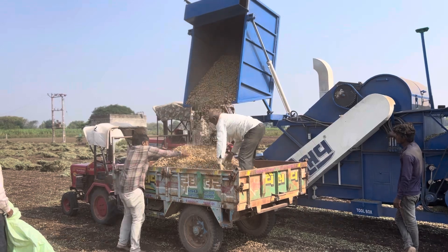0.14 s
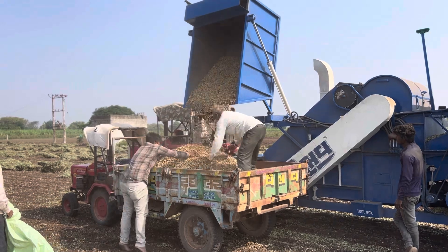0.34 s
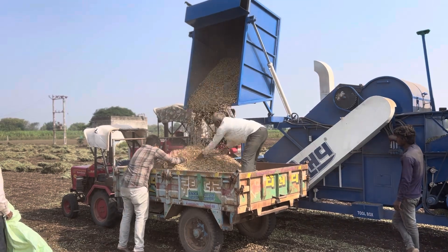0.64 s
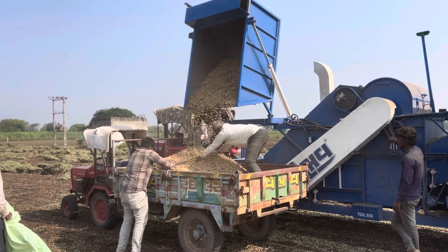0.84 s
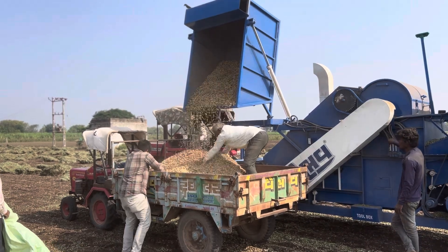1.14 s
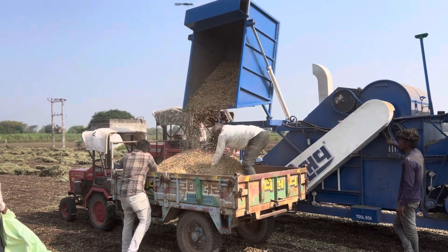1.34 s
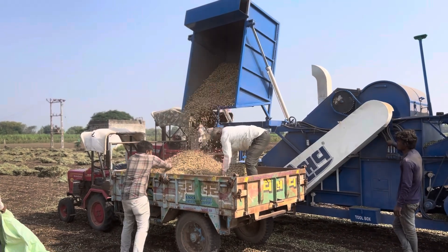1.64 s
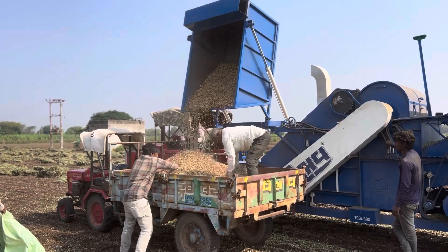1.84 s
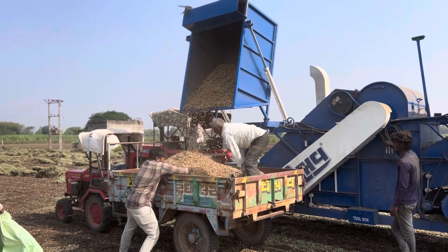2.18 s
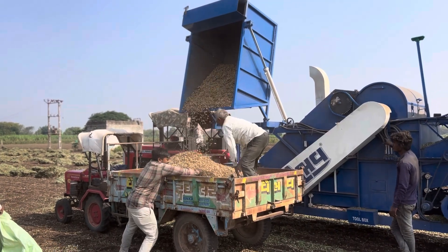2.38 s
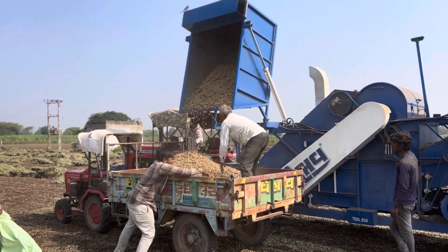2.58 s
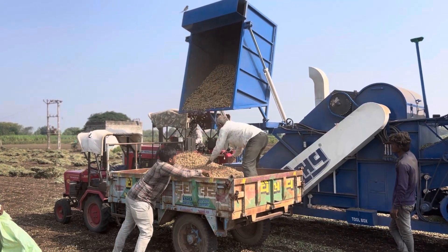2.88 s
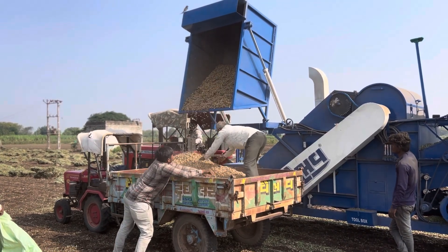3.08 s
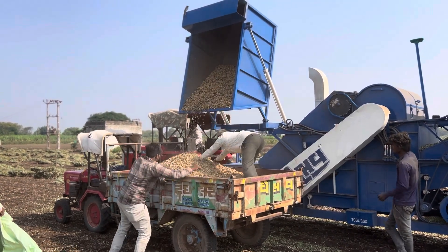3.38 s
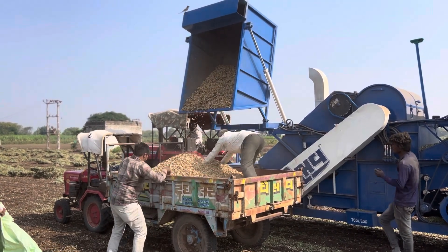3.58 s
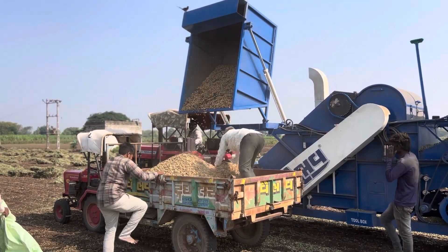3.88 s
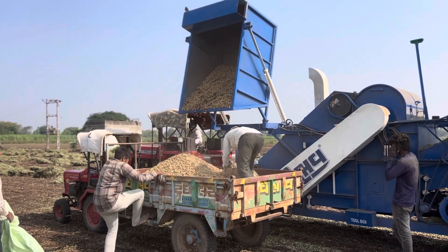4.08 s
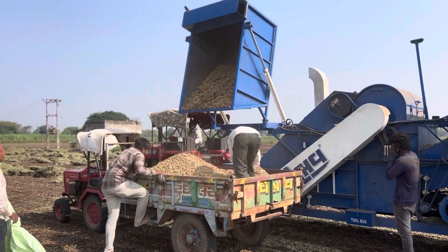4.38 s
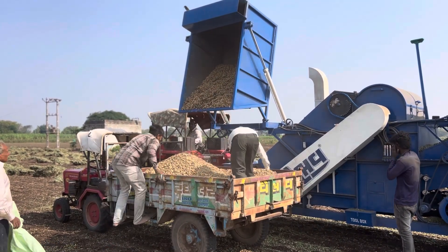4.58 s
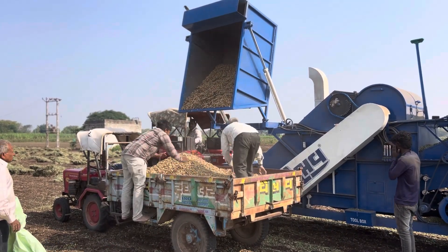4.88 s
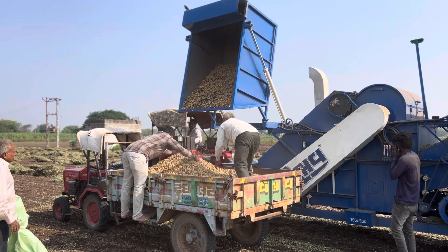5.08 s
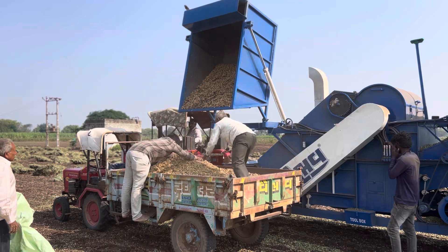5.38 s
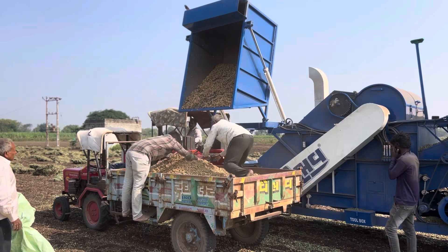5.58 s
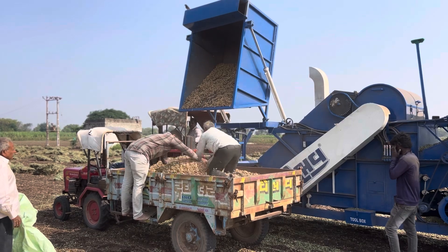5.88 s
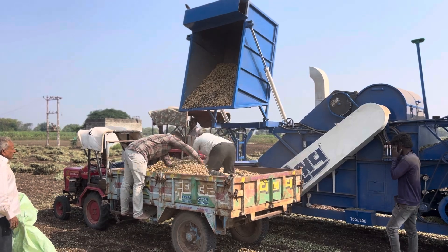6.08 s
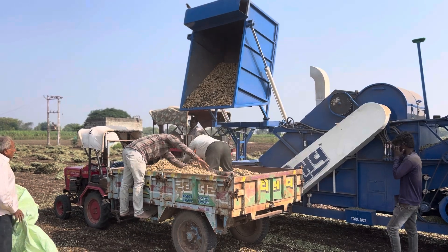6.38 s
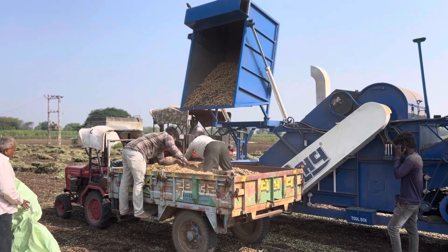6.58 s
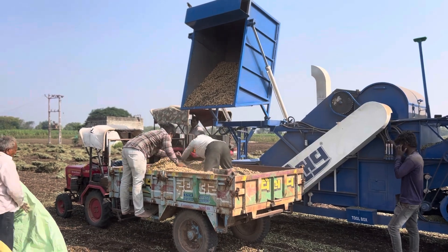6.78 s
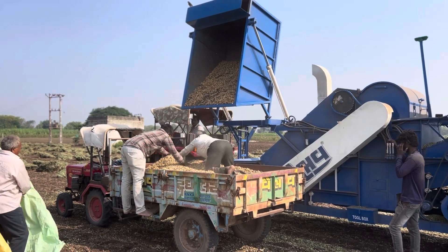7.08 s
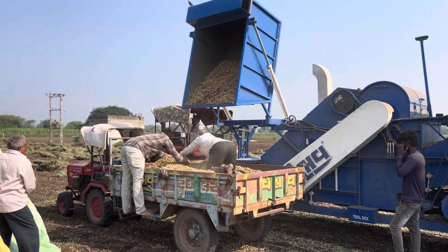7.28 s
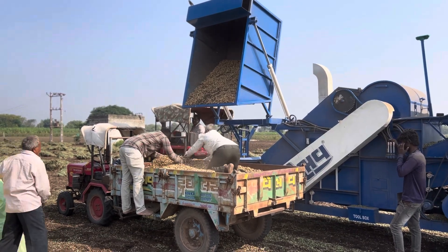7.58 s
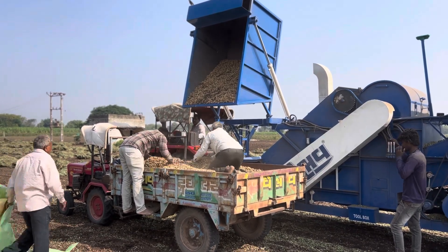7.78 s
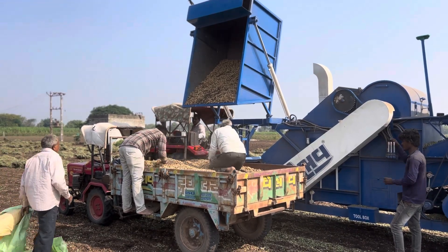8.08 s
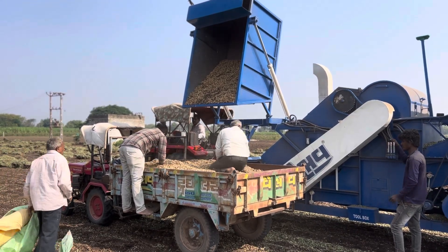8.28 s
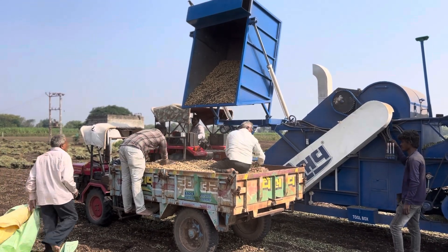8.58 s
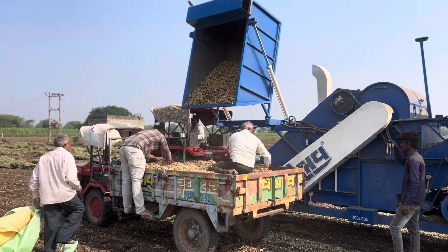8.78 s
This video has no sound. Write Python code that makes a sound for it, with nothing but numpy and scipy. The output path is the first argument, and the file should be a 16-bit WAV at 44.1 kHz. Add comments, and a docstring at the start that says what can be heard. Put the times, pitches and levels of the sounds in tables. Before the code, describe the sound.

An engine-driven thresher runs at constant speed in an open field, with a deep hum, fast chugging throb, rattling sheet metal and rushing fan air. Dry pods stream crisply into a trailer, dwindle after about two seconds to a trickle and stop. Then hands push the heap in soft rustling strokes, with brief gritty scrapes and tiny metal ticks. Stereo pickup, dry open air, no echoing room.

```python
"""An engine drives a thresher at steady speed in an open field while its tipped hopper empties pods into a trailer.
The machine hums, throbs, whines and clatters in step with its camshaft: ten turns a second, three firings a turn.
These sounds are sums of tones and noise timed by the shaft, over faint steady tones and the fan's rush of air.
The pods are thousands of random clicks. Their stream thins out after two seconds; later, hands push the heap
about in rustling strokes, with a few scrapes along the trailer and small hits on metal."""
import sys
import numpy as np
from scipy import signal
from scipy.fft import rfft, irfft
from scipy.io import wavfile

SR = 44100
rng = np.random.default_rng(int(sys.argv[2]) if len(sys.argv) > 2 else 0)


def to_wav(sig):
    """Store sig (one row per channel, or 1-D mono) as 16-bit WAV at the path in sys.argv[1].

    Samples outside -1..1 are clipped; the rate is SR.
    """
    pcm = np.clip(np.atleast_2d(sig), -1, 1) * 32767
    pcm = np.round(pcm).astype(np.int16)
    wavfile.write(sys.argv[1], SR, pcm.T)  # frames by channels


N = 394075
T = np.arange(N) / SR  # time of each sample, seconds
HZ = np.fft.rfftfreq(N, 1 / SR)  # pitch of each step of the spectrum


def gain_of(db):
    """Turns decibels into a plain multiplier of the wave."""
    return 10 ** (np.asarray(db) / 20)


def evened(x):
    """Scales a signal to an rms (average strength) of 1."""
    return x / np.sqrt(np.mean(x ** 2) + 1e-20)


def read(points, hz):
    """Reads a table between its points, with pitch spaced by ratio as the ear hears it."""
    f, value = np.transpose(points)
    return np.interp(np.log(hz + 1), np.log(f + 1), value)


def shaped(x, gain):
    """Filters a signal by multiplying each frequency by its own gain."""
    return irfft(rfft(x) * gain, N)


def wander(rate_hz):
    """A smooth random drift of rms 1: noise with everything much faster than rate_hz removed."""
    count = 4096
    hz = np.fft.rfftfreq(count, N / SR / count)
    slow = irfft(rfft(rng.standard_normal(count)) / (1 + (hz / rate_hz) ** 4))
    return evened(np.interp(T, np.linspace(0, N / SR, count), slow))


# How alike the two microphone ports hear a sound.
# Each row: pitch in Hz, likeness (1 is the same on both sides, 0 is unrelated).
LIKENESS = [(100, 1), (300, 0.96), (640, 0.89), (1400, 0.8), (3000, 0.29), (5000, 0.39), (8500, 0.4),
            (15000, 0.045)]


def ports(pair, gain):
    """Colours two unrelated signals and mixes them into a left and right that are partly alike."""
    a, b = rfft(pair) * gain
    same = np.clip(read(LIKENESS, HZ), -1, 1)
    mid = a * np.sqrt((1 + same) / 2)
    side = b * np.sqrt((1 - same) / 2)
    return irfft(np.array([mid + side, mid - side]), N)


# Speed of the camshaft.
# Each row: time in seconds, speed in turns per second.
SPEED = [(0.0, 10.07), (0.7, 10.104), (1.4, 10.062), (2.5, 10.081), (4.0, 10.093), (5.5, 10.105),
         (6.5, 10.1), (7.8, 10.094), (8.94, 10.129)]


def shaft(shake_turns=.0005):
    """Adds up the speed into the angle of the camshaft in turns, slightly unsteady."""
    start_turns = -.0095
    angle = np.cumsum(np.interp(T, *np.transpose(SPEED))) / SR + start_turns
    return angle + shake_turns * wander(6)


def tones(turns, table, lag):
    """Sums tones at whole multiples of the shaft speed, each held back by its lag in cycles."""
    waves = [gain_of(db) * np.cos(2 * np.pi * (k * turns - lag[k - 1])) for k, db in table]
    return np.sqrt(2) * sum(waves)


# Rush of the fan.
# Each row: pitch in Hz, level in dB per Hz.
RUSH = [(15, -81), (32, -74), (55, -61.5), (82, -59), (108, -63), (158, -57.3), (200, -63.5), (230, -65),
        (268, -62.5), (330, -69.5), (385, -70.5), (460, -78), (620, -73), (750, -79), (2000, -86.5),
        (6000, -110)]


def fan(gust_db=-0.9):
    """Turbulent air under the hum: coloured noise that slowly gusts."""
    air = rng.standard_normal((2, N)) * gain_of(gust_db * wander(2.1))
    return ports(air, gain_of(read(RUSH, HZ))) * np.sqrt(SR / 2)


# Faint tones out of step with the shaft.
# Each row: pitch in Hz, level in dB rms.
DRONES = [(50, -53), (76.8, -48.5), (208.2, -47.5), (251.9, -48)]


def drones(drift_turns=0.28):
    """Weak, wavering tones that beat against the hum."""
    waves = [gain_of(db) * np.sin(2 * np.pi * (hz * T + drift_turns * wander(0.84))) for hz, db in DRONES]
    return np.sqrt(2) * sum(waves)


# Single pods and bits that strike metal.
# Each row: start in seconds, ring peak in dB, ring pitch in Hz, time for the ring to fall 60 dB in seconds,
# snap against the ring in dB.
TICKS = [(.839, -29.5, 6460, 0.035, -9), (1.7575, -30, 4900, .015, -20), (1.9256, -25, 4500, .015, -22),
         (3.986, -36, 6460, .02, -20), (4.559, -33, 6300, 0.053, -24), (4.921, -39, 8000, 0.02, -1),
         (5.367, -38, 8640, .025, -3), (7.295, -43, 8350, .03, -14), (8.111, -41, 5800, .02, -6)]


def ticks(width_hz=220, snap_s=0.00049):
    """Each stray hit is a dry snap of noise and a short ring of five tones close in pitch."""
    out = np.zeros((2, N))
    t = np.arange(SR // 10) / SR
    for start, db, hz, t60, snap_db in TICKS:
        partials = hz + width_hz * rng.standard_normal((5, 1))
        waves = np.sin(2 * np.pi * (partials * t + rng.random((2, 5, 1))))
        ring = waves.sum(1) * gain_of(-60 * t / t60)
        ring = ring * np.minimum(t / .001, 1)  # starts softly over a millisecond
        snap = gain_of(snap_db) * rng.standard_normal((2, len(t))) * np.exp(-t / snap_s)
        part = out[:, round(start * SR):][:, :len(t)]
        part += gain_of(db) * (ring / abs(ring).max() + snap)
    return out


def crackle(per_s, size_db):
    """Two unrelated trains of clicks at random moments, most small, a few large."""
    sizes = gain_of(size_db * np.minimum(rng.exponential(1, (2, N)), 5))
    signs = rng.choice([-1, 1], (2, N))
    happens = rng.random((2, N)) < per_s / SR
    return evened(sizes * signs * happens)


def resonate(x, hz, width):
    """A steep resonance that follows the curve hz: shifts it down to zero pitch, smooths, shifts back."""
    turn = np.exp(2j * np.pi * np.cumsum(hz) / SR)
    r = np.exp(-np.pi * width / SR)
    smooth = signal.lfilter([(1 - r) ** 2], [1, -2 * r, r ** 2], x / turn)
    return (turn * smooth).real


GRIT_TOP_HZ = 9300  # grit has little hiss above this pitch
# Pods scrape along the trailer's walls.
# Each row: start in seconds, length in seconds, level in dB before the rise and fall,
# resonance at the start in Hz, resonance at the end in Hz, its width in Hz.
SCRAPES = [(3.985, .045, -49, 4800, 4800, 2500), (4.432, .04, -40.5, 3800, 4200, 2000),
           (4.63, .16, -45, 5200, 4800, 3500), (4.653, .025, -39.5, 3150, 3050, 700),
           (4.665, .115, -43.5, 3080, 2950, 500), (4.695, .05, -38.5, 1650, 2500, 600),
           (5.742, .06, -42, 3500, 3000, 2500), (6.515, .06, -50, 4300, 4300, 2000),
           (7.19, .06, -48.5, 4500, 5200, 3500), (8.105, .13, -51, 4900, 4900, 3500)]


def scrapes(per_s=3500, size_db=1.5, judder_db=3, attack_s=0.0092):
    """Each scrape catches quickly and judders out: gritty clicks through one resonance that may glide."""
    grit = crackle(per_s, size_db) * gain_of(judder_db * wander(90))
    out = np.zeros((2, N))
    for start, length, db, from_hz, to_hz, width in SCRAPES:
        span = slice(round(start * SR), round((start + length) * SR))
        t = T[span] - T[span][0]
        glide_hz = from_hz + (to_hz - from_hz) * t / length
        band = resonate(grit[:, span], glide_hz, width)
        scrape = evened(band + band.mean(0))  # brings the two sides closer together
        rise_and_fall = np.minimum(t / attack_s, 1) * (1 - (t / length) ** 2)
        out[:, span] += gain_of(db) * scrape * rise_and_fall
    return shaped(out, 1 / (1 + (HZ / GRIT_TOP_HZ) ** 16))


def dying(from_s, decay_s):
    """Holds at 1 until from_s, then dies away, falling to about a third every decay_s."""
    return np.exp(-np.maximum(T - from_s, 0) / decay_s)


# A full stream slowly sags, dwindles to a trickle as the hopper empties, then stops.
# The levels of pour, settling and strokes are relative: pods() sets the whole rustle's level.
POUR_DB, POUR_SAG_DB_PER_S, TRICKLE_DB = -35.5, 1, -44.5
DWINDLE_AT_S, DWINDLE_S, STOP_AT_S, STOP_S = 2.28, 0.69, 4.63, 0.093


def pour():
    """Power of the pods that fall from the hopper: the stream or the trickle, whichever is stronger."""
    stream = gain_of(POUR_DB - POUR_SAG_DB_PER_S * T) ** 2 * dying(DWINDLE_AT_S, DWINDLE_S)
    trickle = (gain_of(TRICKLE_DB) * dying(STOP_AT_S, STOP_S)) ** 2
    return np.maximum(stream, trickle)


SETTLE_DB = -57.5  # pods that keep settling in the heap
LOOSE_CRISP_DB = -3.5  # treble against the body of the rustle, for falling or settling pods
# Every stroke swells (the longer, the more slowly), holds, and dies away as the pods come to rest.
STROKE_ATTACK_S, STROKE_ATTACK_SHARE, STROKE_RELEASE_S = 0.019, 0.13, 0.081
# Hands push the heap.
# Each row: start in seconds, length in seconds, relative level in dB, treble against that level in dB.
STROKES = [(4.396, .015, -49, -14), (4.523, 0.079, -43, -10), (4.61, 0.15, -42.5, -4),
           (5.09, 0.045, -44.5, -6), (5.263, 0.57, -49, -9.5), (5.72, 0.064, -41.5, -10),
           (5.814, 0.48, -43.5, -8), (6.3, 0.33, -46.5, -9), (7.09, 0.07, -49.5, -8),
           (7.185, 0.036, -47, -10), (7.278, 0.24, -51.5, -7.5), (7.495, 0.33, -46, -10),
           (7.85, 0.3, -50.5, -10), (8.074, 0.27, -49.5, -4.5), (8.328, 0.61, -49, -5.5)]


def flow():
    """Strength of the body and of the treble of the rustle: pour, settling and strokes add in power."""
    body = pour() + gain_of(SETTLE_DB) ** 2
    treble = body * gain_of(LOOSE_CRISP_DB) ** 2
    for start, length, db, crisp_db in STROKES:
        attack_s = STROKE_ATTACK_S + STROKE_ATTACK_SHARE * length
        swell = np.clip((T - start) / attack_s, 0, 1) * dying(start + length, STROKE_RELEASE_S)
        power = (gain_of(db) * swell) ** 2
        body = body + power
        treble = treble + power * gain_of(crisp_db) ** 2
    return np.sqrt(body), np.sqrt(treble)


def hollow_pods(per_s=1500, size_db=1, t60_s=.03, low_hz=1700, high_hz=5800, size=600):
    """Whole pods knock together and ring briefly, each at its own pitch."""
    when, pitch, strength, side = rng.random((round(per_s * N / SR), 4, 1)).transpose(1, 0, 2)
    t = np.arange(size) / SR
    # most knocks are small, a few large
    level_db = size_db * np.minimum(-np.log(1 - strength), 4) - 60 * t / t60_s
    ring_hz = low_hz + (high_hz - low_hz) * pitch
    rings = gain_of(level_db) * np.sin(2 * np.pi * ring_hz * t)
    # each ring lands on the left or, N samples further on, the right
    at = (when * (N - size)).astype(int) + np.arange(size) + N * (side > .5)
    return evened(np.bincount(at.ravel(), rings.ravel(), 2 * N).reshape(2, N))


# Colour of the pod shells.
# Each row: pitch in Hz, relative level in dB per Hz.
SHELLS = [(400, -12), (1000, -10.5), (1600, 0.5), (2000, 4), (2480, 0.5), (2990, 8), (3240, 1.5), (3480, 3),
          (3900, 3), (4900, 0.1), (5600, -9.5), (7300, -15), (8300, -11.5), (9100, -14.5), (9600, -26.5),
          (10000, -51), (15500, -28.5)]
# A close reflection on the right.
# The values: delay in seconds, strength, pitch in Hz above which it fades.
ECHO = (.00124, .42, 4600)


def pods(per_s=8000, size_db=2.5, clump_db=0.82, level_db=-2.5, split_hz=6000, hollow_db=-10):
    """Thousands of dry shells click against each other in small clumps, with whole pods knocking among them."""
    clicks = crackle(per_s, size_db) + gain_of(hollow_db) * hollow_pods()
    rustle = ports(clicks * gain_of(clump_db * wander(23)), gain_of(read(SHELLS, HZ)))
    # the reflection ripples the colour on the right
    echo_s, strength, fade_hz = ECHO
    echo = strength / (1 + (HZ / fade_hz) ** 6)
    ripple = (1 - echo * np.exp(-2j * np.pi * HZ * echo_s)) / np.hypot(1, echo)
    rustle[1] = shaped(rustle[1], ripple)
    # body and treble are split so that each can follow its own strength
    body_gain, treble_gain = flow()
    crisp = shaped(rustle, 1 - 1 / (1 + (HZ / split_hz) ** 16))
    body = rustle - crisp
    body = body / np.std(shaped(body.mean(0), HZ > 2600))  # levelled by its part above 2600 Hz
    crisp = crisp / np.std(crisp.mean(0))
    return gain_of(level_db) * (body_gain * body + treble_gain * crisp)


# Thin high tones from the knocks coming back every turn. # Each row: multiple of the shaft speed, level in dB
# rms before it wavers.
WHINE = [(86, -65), (120, -61), (121, -63), (123, -65), (126, -64), (129, -63), (130, -65), (135, -62),
         (141, -60), (144, -64), (147, -62), (150, -63), (153, -61), (161, -65), (162, -63), (165, -65),
         (177, -65), (198, -65), (207, -65)]


def whine(turns, waver_db=2.5, wobble_turns=0.0009):
    """Thin high tones of the repeating knocks that waver slightly in pitch, and swell and fade each in its own
    way."""
    turns = turns + wobble_turns * wander(7.7)
    total = 0
    for k, db in WHINE:
        level = gain_of(db + waver_db * wander(2.4))
        total = total + level * np.cos(2 * np.pi * (round(k) * turns + rng.random()))
    return np.sqrt(2) * total


# Knocks of the machine within one turn.
# Each row: place in turns, length of the dying clatter in turns, relative clatter in dB,
# relative blow on the side panel in dB.
KNOCKS = [(.172, .05, 5, -3), (.301, .02, 4, -17), (.459, .11, 3, -14), (.623, .022, 5, -12.5),
          (.739, .025, -8, -4.5), (.838, .06, 5, 0)]
# Modes of the side panel, the pitches at which it rings.
# Each row: pitch in Hz, width in Hz, strength at the peak in dB.
PANEL = [(794, 34, -68.5), (846, 68, -75.5)]


def panel(turns, uneven_db=-1.0, loose=0.77, late_turns=0.00066):
    """Knocks, each a little early or late, ring one side panel; loose parts keep it stirring in between."""
    turns = turns + late_turns * wander(9.4)
    blows = 0
    for place, _, _, db in KNOCKS:
        passes = np.diff((turns - place) % 1, prepend=0) < -.5  # the shaft passes this place
        blows = blows + gain_of(db) * passes
    drive = evened(blows * gain_of(uneven_db * wander(27))) + loose * rng.standard_normal(N)
    modes = 0
    for hz, width, db in PANEL:
        peak = 1j * HZ * width / (hz ** 2 - HZ ** 2 + 1j * HZ * width)
        narrowing = 1 + ((HZ - hz) / (5 * width)) ** 2  # weakens the far skirts of the peak
        modes = modes + gain_of(db) * peak / narrowing
    return shaped(drive, modes) * np.sqrt(SR / 2)


def rattle(turns, repeat, size=4400):
    """Two noises of which a share, given by repeat, comes back alike with every turn."""
    repeat = np.clip(repeat, 0, 1)
    one_turn = irfft(np.exp(2j * np.pi * rng.random((2, size // 2 + 1))))
    alike = evened(one_turn)[:, (turns % 1 * size).astype(int)]
    return np.sqrt(repeat) * alike + np.sqrt(1 - repeat) * rng.standard_normal((2, N))


# Colour of the clatter, before the sheets lift it.
# Each row: pitch in Hz, level in dB per Hz.
CLATTER = [(300, -104.5), (480, -77), (900, -79.5), (1080, -75), (1300, -74), (1750, -77), (2100, -75.5),
           (2500, -82), (4000, -89.5), (6000, -93.5), (9000, -101), (10200, -130)]
# Ringing sheet metal.
# Each row: pitch in Hz, width in Hz, lift in dB.
SHEETS = [(620, 110, 8), (835, 34, 6.5), (959, 59, 9), (1400, 18, -3), (1803, 21, 9), (1968, 60, 7),
          (2270, 23, 12.5), (2460, 30, 3.5)]
# The clatter eases and hardens again.
# Each row: time in seconds, change in dB.
CLATTER_SWELL = [(0, 0), (3, -0.9), (5.8, 0), (6.7, -1), (7.4, -.6), (8.2, 1), (8.94, 1)]


def clatter(turns, between_db=-1, uneven_db=0.65, repeat=0.55):
    """The knocks of each turn set loose sheet metal chattering: bursts of noise over a steady rattle."""
    power = gain_of(between_db) ** 2
    for place, length, clatter_db, _ in KNOCKS:
        since_knock = (turns - place) % 1
        power = power + np.exp(-since_knock / length) * gain_of(clatter_db) ** 2
    drive = rattle(turns, repeat) * np.sqrt(power) * gain_of(uneven_db * wander(21))
    lifts = sum(db / (1 + (2 * (HZ - hz) / width) ** 2) for hz, width, db in SHEETS)
    colour_db = read(CLATTER, HZ) + lifts
    swell = gain_of(np.interp(T, *np.transpose(CLATTER_SWELL)))
    return ports(evened(drive) * swell, gain_of(colour_db)) * np.sqrt(SR / 2)


# Deep exhaust hum of three firings a turn.
# Each row: multiple of the shaft speed, level in dB rms before it wavers.
HUM = [(3, -49), (6, -31.4), (9, -22.9)]
# Throb, once a turn.
# Each row: multiple of the shaft speed, level in dB rms before the throb's trim and waver.
THROB = [(4, -56), (5, -49), (7, -43), (8, -42), (10, -51), (11, -60), (12, -40), (13, -38), (14, -45),
         (15, -47), (16, -43), (17, -43), (18, -47), (20, -53), (21, -51), (22, -49), (23, -50), (24, -47),
         (25, -50), (26, -64), (27, -50), (28, -51), (29, -58), (30, -51), (31, -64), (32, -57), (33, -58),
         (34, -52), (35, -49), (36, -59), (37, -50), (38, -54), (39, -55), (40, -56), (42, -58), (44, -64),
         (45, -63), (50, -63), (52, -62)]
# Each band of the throb arrives at its own point in the turn.
# Each row: pitch in Hz, delay in turns.
SWEEP = [(80, .58), (120, .5), (133, .74), (152, .58), (171, .95), (183, .54), (200, .58), (213, 1.02),
         (245, .75), (282, .26), (296, .82), (320, 1.0), (356, 1.04), (378, 1.14)]
SLIP_TURNS = .0013  # each throb comes a little early or late


def throb(turns, throb_db=-0.33, hum_waver_db=0.2, throb_waver_db=-0.9):
    """A deep steady hum, and above it a chug that sweeps upward in stages once a turn."""
    order_hz = np.arange(1, 60) * np.mean(SPEED, axis=0)[1]  # multiples of the mean shaft speed
    lag = np.cumsum(read(SWEEP, order_hz))  # delays add up to a lag in cycles for each tone
    # near the microphone's low cut the deepest tone runs ahead
    bass_lag = -.42 * (30 / order_hz) ** 6
    hum = tones(turns, HUM, bass_lag) * gain_of(hum_waver_db * wander(1.9))
    chug = tones(turns + SLIP_TURNS * wander(3.0), THROB, lag)
    return hum + chug * gain_of(throb_db + throb_waver_db * wander(38))


def scene():
    """The machine and the pods in the open air."""
    turns = shaft()
    machine = throb(turns) + drones() + whine(turns) + clatter(turns) + panel(turns) + fan()
    return machine + pods() + scrapes() + ticks()


# Level of the left port against the right.
# Each row: pitch in Hz, left minus right in dB.
LEAN = [(60, .7), (200, .3), (380, 1), (700, -1.5), (1290, 2), (2380, 0), (4700, .5), (5600, -5),
        (6500, -2.5), (8120, -2.5), (15000, 0)]
# How far the left port runs ahead of the right.
# Each row: pitch in Hz, lead in radians.
LEAD = [(50, 0), (160, -.22), (300, -.24), (420, .05), (490, .65), (660, -.1), (940, 1), (1200, .2),
        (1850, -.3), (2350, 1.4), (2700, .9), (3190, 2.3), (3450, .6), (6100, 0), (7300, 2.8), (8100, .1),
        (9500, -.9)]
EDGE_HZ = 15900  # nothing much passes above this pitch


def record(dry):
    """Gives each microphone port its own colour, delays the right by pitch, then limits the band."""
    lean_db = read(LEAN, HZ) / 2
    left = gain_of(lean_db)
    right = gain_of(-lean_db) * np.exp(-1j * read(LEAD, HZ))
    coloured = shaped(dry, np.array([left, right]))
    low_pass = signal.firwin(511, EDGE_HZ, window=("kaiser", 9), fs=SR)
    return signal.oaconvolve(coloured, low_pass[None], "same")


dry = scene()
out = record(dry)
to_wav(out)
```